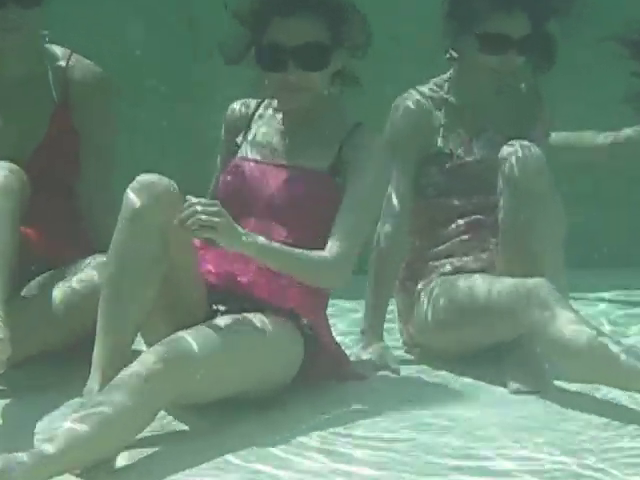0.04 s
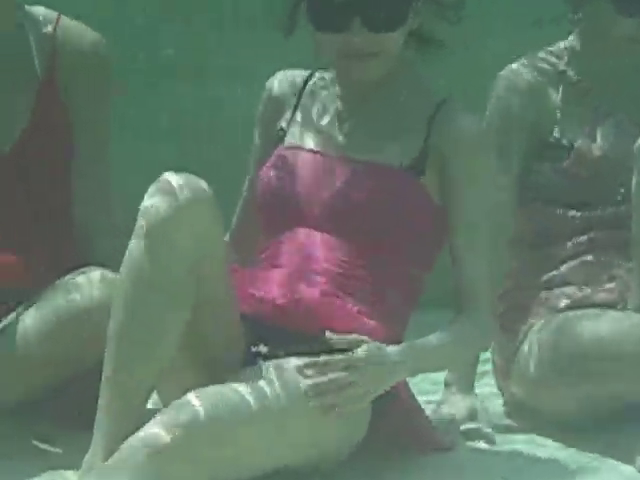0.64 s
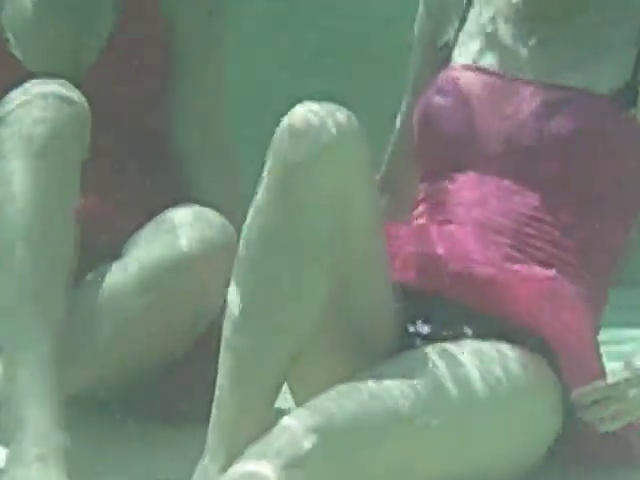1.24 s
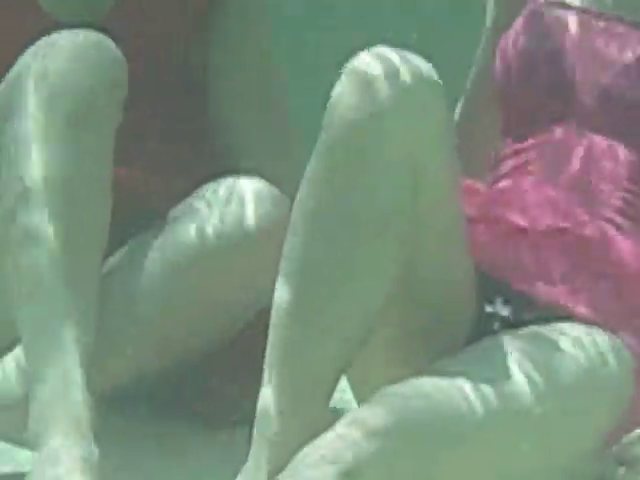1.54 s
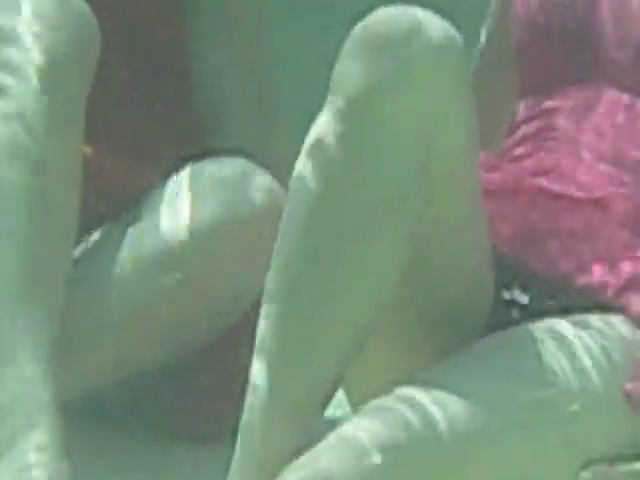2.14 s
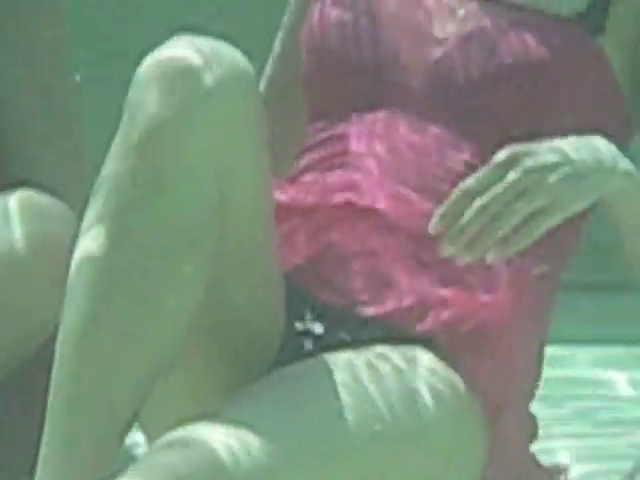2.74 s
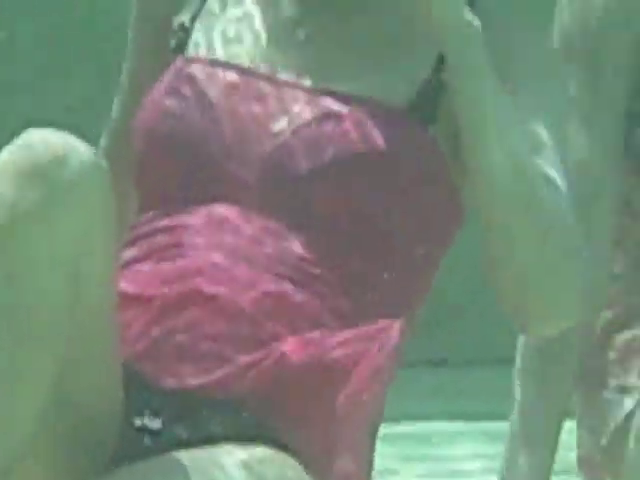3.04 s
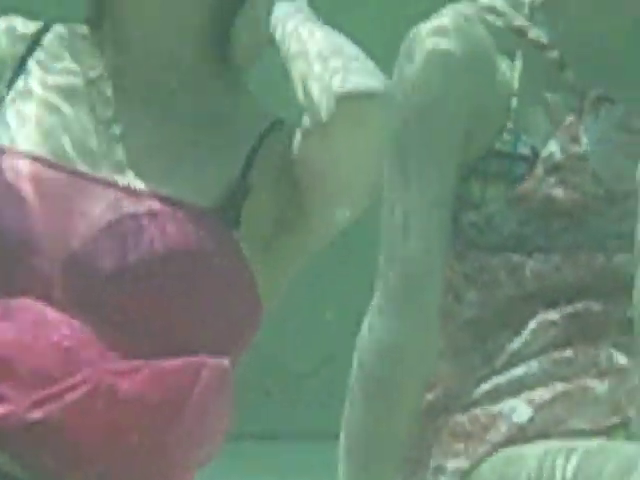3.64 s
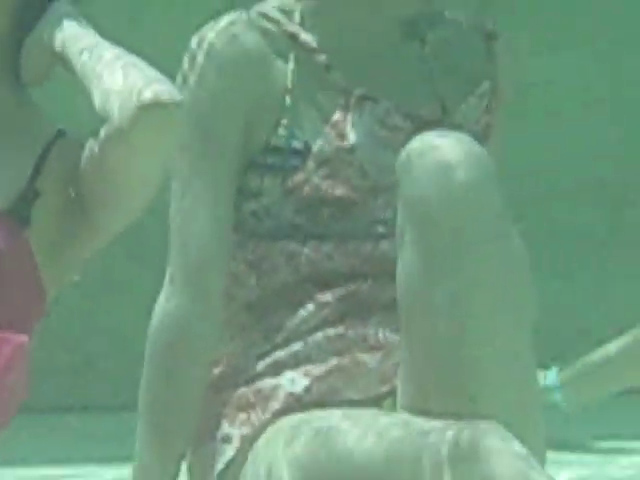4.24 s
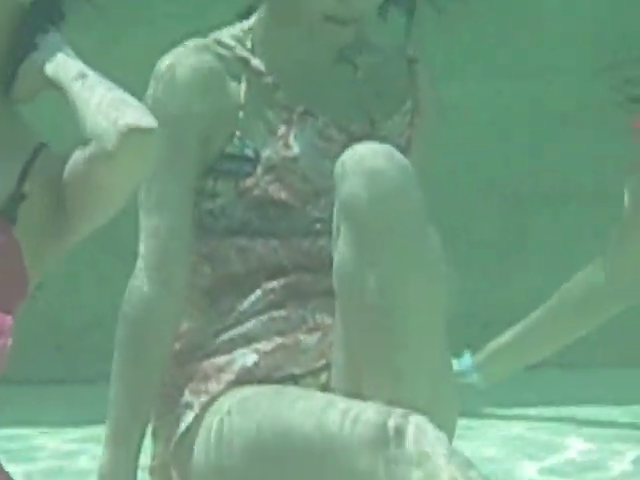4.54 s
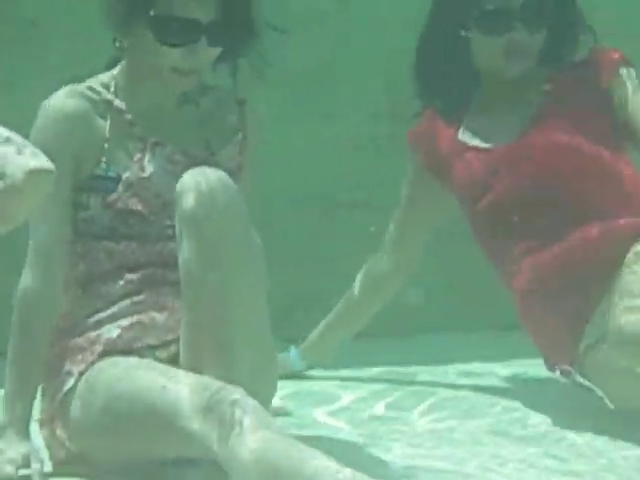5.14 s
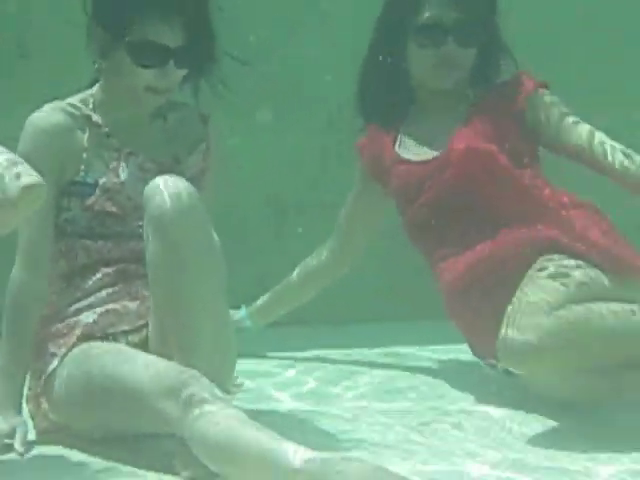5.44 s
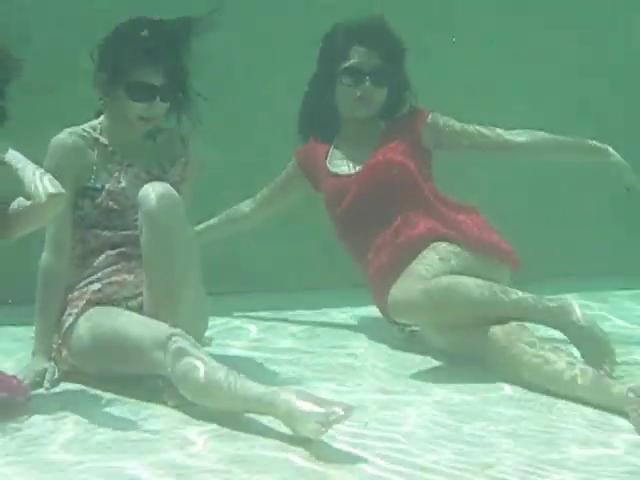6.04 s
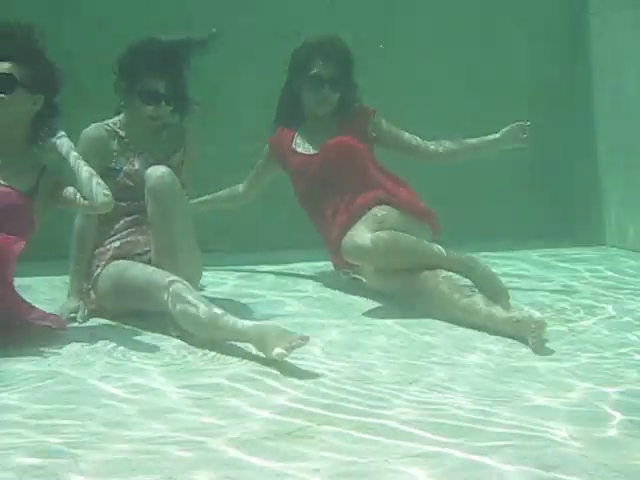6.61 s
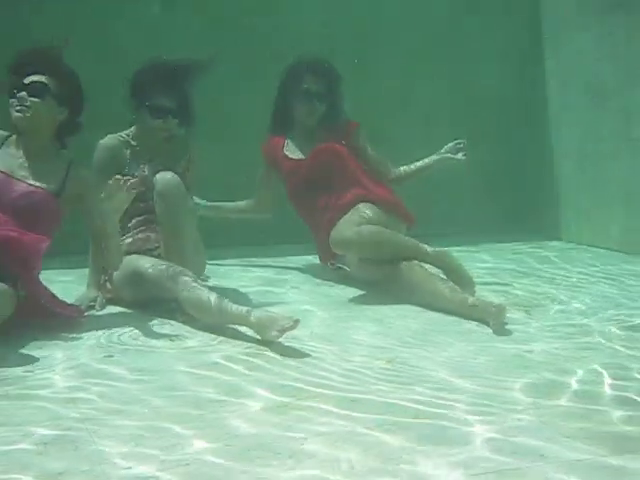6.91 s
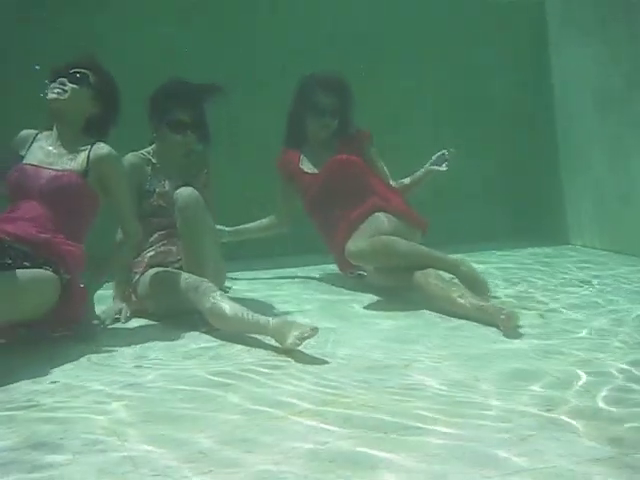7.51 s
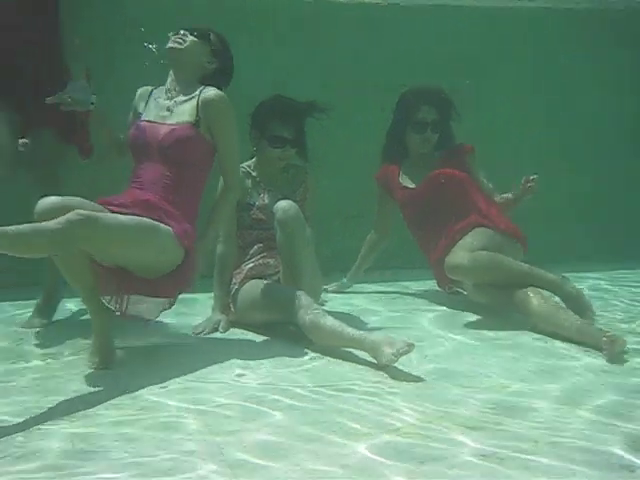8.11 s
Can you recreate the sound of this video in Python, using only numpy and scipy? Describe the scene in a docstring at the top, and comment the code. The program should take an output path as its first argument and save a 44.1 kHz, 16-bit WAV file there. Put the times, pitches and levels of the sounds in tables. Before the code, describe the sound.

Underwater in a swimming pool, churned water makes a steady muffled wash with small bubbles plinking near and far. The camera adds a faint hiss, thin whine and rapid ticking. A few seconds in, fingers knock and rub on its waterproof housing, followed by light rubs and soft, low bumps. Near the end comes the hardest knock, briefly overloading the microphone, then lighter clicks and rubs.

```python
"""Bottom of a swimming pool, heard through the microphone of a hand-held camera in a watertight housing.
From the start churned water makes a muffled wash with bubbles ringing near and far; right at the
microphone the camera hisses, whines and ticks once a frame, and the hand rumbles and bumps on the housing.
At 2.6 s fingers knock and rub on it, then rub again around 4 s. The grip shifts and bumps at 5.3 and 6.1 s.
At 7.1 s the hardest knock overloads the input and ducks the gain; lighter rubs and clicks follow."""
import sys
import numpy as np
from scipy import signal
from scipy.fft import rfft, irfft
from scipy.io import wavfile

SR = 44100
rng = np.random.default_rng(int(sys.argv[2]) if len(sys.argv) > 2 else 0)


def unload_audio(sound):
    """Save the sound as a 16-bit wav file, at the path given as the first command line argument."""
    columns = np.transpose(np.atleast_2d(sound))
    # keep every value between -1 and 1, then stretch to whole-number steps
    steps = np.round(np.clip(columns, -1, 1) * 32767)
    wavfile.write(sys.argv[1], SR, steps.astype(np.int16))


N = 369116
TIME = np.arange(N) / SR
HZ = np.fft.rfftfreq(N, 1 / SR)

# spectrum of the distant wash: f/Hz, relative level/dB
WASH_SPECTRUM = [(15, -2.5), (40, -4.5), (150, -4), (400, -1), (1000, 2), (1350, -5.5), (1750, -5),
                 (2300, -14.5), (2900, -13), (3500, -20.5), (5000, -24.5), (9000, -48)]
# resonances and nulls through which the water is heard: f/Hz, width/Hz, gain/dB
WATER_RESONANCES = [(344, 24, 2), (375, 67, -1.5), (455, 30, 4), (734, 92, -2.5), (842, 63, 3.5),
                    (954, 110, -2.5), (1016, 69, 6.5), (1235, 107, 5), (1430, 66, 2), (1521, 78, -9.5),
                    (1686, 86, 3), (1816, 200, -3), (2080, 150, 3.5), (2695, 160, 3.5), (3080, 140, -4)]
# spectrum of the camera's hiss: f/Hz, relative level/dB
HISS_SPECTRUM = [(500, -26), (3500, 4), (4400, -1), (5600, 4.5), (7000, 2), (8500, -3.5), (9700, -4.5),
                 (10700, -0.5), (12000, -6.5), (14500, -6.5), (15800, -11)]
# whines in that hiss: f/Hz, width/Hz, gain/dB
HISS_WHINES = [(5000, 260, 5.5), (5875, 220, 10.5), (6200, 200, 2.5), (7900, 110, 4), (11400, 56, 10.5)]
# shifts of the grip: middle t/s, length/s, rumble level/dB
GRIP_SHIFTS = [(3.598, 0.68, -55), (5.28, 0.23, -51), (6.112, 0.21, -52), (7.93, 0.69, -56.5)]
# bubbles close to the microphone: t/s, ring level/dB, f/Hz
NEAR_BUBBLES = [ (.069, -38, 2200), (.085, -39.5, 1760), (.130, -30.5, 1167), (.209, -37.5, 557),
                (.667, -34.5, 1620), (1.063, -40.5, 1710), (1.325, -43.5, 1610), (1.88, -39.5, 1810),
                (4.357, -39, 1790), (4.410, -34.5, 1210), (4.553, -39, 875), (5.201, -38, 1630),
                (5.384, -43, 1810), (6.65, -40, 1670), (6.788, -45, 2730), (6.858, -45, 2770),
                (7.957, -34, 884), (8.232, -33.5, 930)]
# modes of the housing: f/Hz, relative level/dB, t60/s
HOUSING_MODES = [(180, -9.5, 0.032), (305, -5, 0.026), (452.6, 3.5, 0.05), (638, 7.5, 0.017),
                 (862, 1.5, 0.039), (934, -14.5, 0.11), (1348, 6.5, 0.019), (1940, -39, 0.0027),
                 (2003, 6, 0.022), (2230, 4.5, 0.017), (2640, 3.5, 0.02), (3010, -6, 0.026),
                 (3600, 3, 0.014), (4920, 19.5, 0.0031), (5200, 9, 0.013), (6130, 14.5, 0.0067),
                 (7360, 4.5, 0.012), (10100, 4, 0.0056), (10460, -25, 0.0055), (13650, -4, 0.013),
                 (13500, -7, .005), (15400, -14, .007)]
# soft bumps of the hand: t/s, level/dB over 10 ms, centre f/Hz
SOFT_BUMPS = [ (1.421, -46.5, 170), (2.648, -39.5, 410), (3.5466, -39.5, 330), (4.725, -43.5, 330),
              (5.351, -36.5, 360), (5.67, -46, 270), (6.0096, -30, 362), (6.0527, -38.5, 265),
              (6.1223, -39.5, 400), (6.181, -42, 290), (6.227, -41.5, 220), (6.9615, -34, 550),
              (7.058, -28, 425), (7.0749, -36, 370), (7.0823, -34, 316), (7.1362, -29, 196),
              (7.436, -37, 386), (7.7452, -36, 300), (7.883, -39.5, 372), (8.0322, -38, 350),
              (8.3091, -35.5, 366)]
# hard knocks and clicks: t/s, level/dB over 10 ms before the bass cut, centre f/Hz, spread/octaves,
# share of bright edge, note of the struck spot f/Hz, share of that note
HARD_KNOCKS = [ (2.569, -38.5, 2750, 0.4, .02, 2720, 2), (2.6018, -28.5, 1300, 2.4, .15, 740, 1.4),
               (2.6075, -30, 1100, 1.6, .08, 2780, 1), (2.6123, -28.5, 800, 1.4, .03, 650, 1.9),
               (2.6389, -24, 1880, 0.93, .03, 800, 0.65), (2.6430, -26.5, 1390, 1.43, 0.23, 720, 0.41),
               (2.6469, -19.5, 1230, 1.43, .065, 2860, .42), (2.6808, -44, 2240, 1.4, .1, 2140, 0.58),
               (3.6573, -43.5, 2600, 1.2, 0.12, 1720, 1.1), (3.797, -39.5, 6000, 2.2, 0.41, 2080, 0.64),
               (4.016, -37, 1160, .45, .02, 1620, 0.94), (6.232, -34, 4830, .49, 0.24, 3760, 1.15),
               (6.9595, -36.5, 2200, 2.6, 0.39, 564, 0.24), (7.0556, -20.5, 2920, 1.1, 0.29, 5350, .38),
               (7.0610, -33.5, 3000, 1.3, .13, 2740, .5), (7.1357, -11.3, 1710, 2, 0.13, 5160, .33),
               (7.5780, -24.5, 4240, 1.15, 0.3, 5600, .85), (7.7480, -39, 5060, .78, 0.21, 5200, .28),
               (7.8323, -43, 5200, 1.5, .15, 5900, .4), (8.3019, -28.5, 2600, 1.6, .02, 6050, 3.7)]
# finger rubs: start t/s, release t/s, level/dB at release, swell/(dB/s), time to fade by 20 dB/s
FINGER_RUBS = [(2.587, 2.633, -38.5, 50, 0.02), (3.725, 3.812, -42, 150, 0.11),
               (3.946, 4.103, -49, 57, 0.05), (6.929, 7.033, -38, 61, 0.1),
               (7.677, 7.739, -38.5, 170, 0.23)]
# spectrum of skin rasping on the housing: f/Hz, relative level/dB
RASP_SPECTRUM = [(200, -8.5), (500, 13), (1200, -6.5), (2400, 0), (4000, 2), (6000, 2.5), (7600, -5.5),
                 (8500, -7.5), (12500, -11), (15800, -16)]
# resonances that the rasp brings out: f/Hz, width/Hz, gain/dB
RASP_RESONANCES = [(1970, 400, 11.5), (2760, 150, 11), (3430, 230, 9.5), (5140, 610, 6.5), (7300, 480, 9.5),
                   (11200, 300, 9), (12500, 450, 2)]

RESTING_DB = -68.5  # rumble of the hand held still


def gain_of(db):
    """Decibels to amplitude."""
    return 10 ** (np.asarray(db) / 20)


def unit_rms(x):
    """The same sound at rms 1."""
    return x / np.sqrt(np.mean(x ** 2) + 1e-20)


def at_level(x, db):
    """Scales a short sound so that its energy equals 10 ms at db."""
    return gain_of(db) * x * np.sqrt(SR / 100 / np.sum(x ** 2))


def add(mix, s, sound):
    """Mixes a sound in at s seconds."""
    part = mix[max(round(s * SR), 0):][:len(sound)]
    part += sound[:len(part)]


def curve_db(points):
    """Spectrum points joined on a log-frequency axis."""
    hz, db = np.transpose(points)
    return np.interp(np.log(HZ + 1), np.log(hz), db)


def humps_db(rows):
    """Bell-shaped resonances and nulls."""
    return sum(db * .5 ** ((2 * (HZ - hz) / width) ** 2) for hz, width, db in rows)


def coloured(x, db):
    """Filters a whole track by a gain in dB at each frequency."""
    return irfft(rfft(x) * gain_of(db), N)


def drift(top_hz):
    """Random wander of rms 1, slower than top_hz."""
    return unit_rms(irfft(rfft(rng.standard_normal(N)) * (HZ < top_hz), N))


def bell(hz, centre_hz, octaves):
    """A bell-shaped weight on a log-frequency axis."""
    return np.exp(-.5 * (np.log2((hz + 1) / centre_hz) / octaves) ** 2)


def band_noise(size, centre_hz, octaves, top_hz=SR):
    """Noise of rms 1 around a centre, dulled above top_hz."""
    hz = np.fft.rfftfreq(size, 1 / SR)
    shape = bell(hz, centre_hz, octaves) / np.hypot(1, hz / top_hz)
    return unit_rms(irfft(rfft(rng.standard_normal(size)) * shape, size))


def wash(level_db=-47.5, swell_db=.3, churn_db=.8):
    """Countless distant bubbles merge into a dull, nearly steady wash; each octave churns by itself."""
    colour_db = curve_db(WASH_SPECTRUM) + humps_db(WATER_RESONANCES)
    spectrum = rfft(unit_rms(coloured(rng.standard_normal(N), colour_db)))
    centres = np.log2(np.geomspace(80, 5000, 7))
    out = np.zeros(N)
    for pick in np.eye(len(centres)):
        band = irfft(spectrum * np.interp(np.log2(HZ + 1), centres, pick), N)
        out += band * gain_of(churn_db * drift(30))
    return gain_of(level_db) * unit_rms(out * gain_of(swell_db * drift(11)))


def camera_hiss(level_db=-60.5):
    """The camera's own steady noise, with thin whines in it."""
    colour_db = curve_db(HISS_SPECTRUM) + humps_db(HISS_WHINES)
    return gain_of(level_db) * unit_rms(coloured(rng.standard_normal(N), colour_db))


def camera_whine(hz=7865, level_db=-73.5, waver_hz=16):
    """The thin, wavering tone of the camera."""
    turns = np.cumsum(hz + waver_hz * drift(71)) / SR
    return gain_of(level_db) * unit_rms(np.sin(2 * np.pi * turns))


def grip_db(s):
    """Level of the hand's rumble at time s: each shift of the grip swells and dies away."""
    shifts = sum(gain_of(db) * .5 ** ((2 * (s - middle) / length) ** 2)
                 for middle, length, db in GRIP_SHIFTS)
    return 20 * np.log10(gain_of(RESTING_DB) + shifts)


def grip_rumble(centre_hz=140, octaves=1.5, lumpy_db=11.5):
    """Handling noise: the hand kneads the housing in low, soft lumps."""
    lumps = band_noise(N, centre_hz, octaves) * gain_of(lumpy_db * np.tanh(drift(36)))
    return gain_of(grip_db(TIME)) * unit_rms(lumps)


def frame_ticks(frame_hz=30, first_s=.0088, tick_s=.0021, tick_hz=5100, tick_db=-70, spark_db=-79):
    """Right at the microphone the camera ticks once a frame: an uneven pip with a spark of high noise."""
    since = (TIME - first_s) % (1 / frame_hz)
    gate = np.sin(np.pi * np.minimum(since / tick_s, 1)) ** 2 * gain_of(2 * drift(34))
    pip = unit_rms(gate * np.sin(2 * np.pi * tick_hz * since))
    spark = unit_rms(gate * band_noise(N, 9900, octaves=.17))
    return gain_of(tick_db) * pip + gain_of(spark_db) * spark


def ring_time(hz):
    """A nearby bubble's t60 in seconds: big, low bubbles ring longest."""
    return .05 * (1500 / hz) ** .64


def bubble(hz, t60, snap=.36, rise=.069, attack_s=.00038, snap_s=.007):
    """A bubble pinches off with a snap, smeared by the pool walls, then rings and rises a little."""
    t = TIME[:SR // 10]
    turns = hz * np.cumsum(1 + rise * (t / t60 - .2)) / SR
    ring = np.sin(2 * np.pi * turns) * gain_of(-60 * t / t60)
    smear = band_noise(len(t), hz, octaves=.3) * np.exp(-t / snap_s)
    return (ring + snap * smear) * (1 - np.exp(-t / attack_s))


def near_bubbles(stray_hz=1800, stray_octaves=.175, stray_db=-51.5, stray_range_db=8):
    """Single bubbles close to the microphone, and strays of like size a little further off."""
    out = np.zeros(N)
    for s, db, hz in NEAR_BUBBLES:
        add(out, s, gain_of(db) * bubble(hz, ring_time(hz), snap=.58))
    for when, pitch, loud in rng.random(size=(30, 3)):
        hz = stray_hz * 2 ** (stray_octaves * (2 * pitch - 1))
        add(out, when * N / SR, gain_of(stray_db + stray_range_db * loud) * bubble(hz, ring_time(hz)))
    return out


def far_bubbles(base_db=-50.5, spread_db=2.5, low_hz=800, high_hz=3000, mean_t60=.053):
    """Many faint bubbles out in the pool, coloured by the water; the small, high ones are weaker."""
    out = np.zeros(N)
    for when, pitch, loud, life in rng.random(size=(480, 4)):
        hz = low_hz * (high_hz / low_hz) ** pitch
        db = base_db + spread_db * min(-np.log(loud), 3)
        strength = gain_of(db) * (low_hz / hz) ** .54
        add(out, when * N / SR, strength * bubble(hz, mean_t60 * (.5 + life)))
    return coloured(out, humps_db(WATER_RESONANCES))


def fizz(base_db=-52, spread_db=3, low_hz=4700, high_hz=6500):
    """Pinhead bubbles prickle now and then."""
    out = np.zeros(N)
    for when, pitch, loud in rng.random(size=(45, 3)):
        hz = low_hz + pitch * (high_hz - low_hz)
        db = base_db + spread_db * min(-np.log(loud), 3)
        add(out, when * N / SR, gain_of(db) * bubble(hz, t60=.019, snap=.25))
    return out


def housing_ring(t, centre_hz, octaves, attack_s=.00045):
    """The water-damped housing rings around the microphone; a touch excites the modes near centre_hz."""
    ring = np.zeros(len(t))
    for k, (hz, db, t60) in enumerate(HOUSING_MODES):
        excitation = (-1) ** k * bell(hz, centre_hz, octaves)
        ring += excitation * gain_of(db - 60 * t / t60) * np.sin(2 * np.pi * hz * t)
    return unit_rms(ring * (1 - np.exp(-t / attack_s)))


def nudges(count=45, base_db=-54, spread_db=5.5, centre_hz=326, follow=.3):
    """Small random bumps, stronger while the grip shifts: rows of t/s, level/dB, f/Hz."""
    when, loud, pitch = rng.random(size=(count, 3)).T
    s = (np.arange(count) + when) / count * N / SR
    db = base_db + follow * (grip_db(s) - RESTING_DB) + spread_db * (2 * loud - 1)
    return list(zip(s, db, centre_hz * 2 ** (pitch - .5)))


def bumps(push_share=.48, push_s=.00043, scuff_share=.12, scuff_hz=1000, scuff_s=.0017):
    """Soft flesh gives the housing a short push and a faint scuff, and rings only its lowest modes."""
    out, t = np.zeros(N), TIME[:SR // 16]
    push = unit_rms(t ** 2 * np.exp(-2 * t / push_s))
    for s, db, centre_hz in SOFT_BUMPS + nudges():
        scuff = unit_rms(band_noise(len(t), scuff_hz, octaves=.85) * np.sqrt(t) * np.exp(-2 * t / scuff_s))
        ring = housing_ring(t, centre_hz, octaves=.34)
        add(out, s, at_level(ring - push_share * push + scuff_share * scuff, db))
    return out


def knocks(contact_s=.0021, crunch_share=.83, edge_hz=11500, bass_cut_hz=240):
    """Fingers strike the housing: a crunch with a bright edge, then the shell and the struck spot ring."""
    out, t = np.zeros(N), TIME[:SR // 16]
    contact = t * np.exp(-2.4 * t / contact_s)
    for s, db, centre_hz, octaves, edge_share, note_hz, note_share in HARD_KNOCKS:
        crunch = unit_rms(contact * band_noise(len(t), centre_hz, octaves, top_hz=3500))
        edge = unit_rms(contact * band_noise(len(t), edge_hz, octaves=.4))
        t60 = .012 * np.sqrt(1500 / note_hz)  # water damps high notes sooner
        note = unit_rms(np.sqrt(t) * gain_of(-60 * t / t60) * np.sin(2 * np.pi * note_hz * t))
        ring = housing_ring(t, centre_hz, octaves)
        add(out, s, at_level(ring + crunch_share * crunch + edge_share * edge + note_share * note, db))
    # such brief contacts carry little bass
    return signal.lfilter(*signal.butter(2, bass_cut_hz, "highpass", fs=SR), out)


def rub_pressure(start, release, db, swell_db_per_s, fade_s, bite_s=.021):
    """The skin takes hold, presses harder until the finger lets go, and the pressure fades."""
    before_db = swell_db_per_s * np.maximum(release - TIME, 0)
    after_db = 20 * np.maximum(TIME - release, 0) / fade_s
    return np.clip((TIME - start) / bite_s, 0, 1) * gain_of(db - before_db - after_db)


def rubbing(slips_per_s=2200, snags_per_s=60, snag_share=.35, smooth_share=.74, flutter_db=1.4):
    """Tiny slips of skin, and now and then a larger snag, rasp on the housing and ring it."""
    slips = rng.standard_normal(N) * (rng.random(N) < slips_per_s / SR)
    snags = (rng.random(N) - .5) * (rng.random(N) < snags_per_s / SR)
    friction = unit_rms(slips) + snag_share * unit_rms(snags) + smooth_share * rng.standard_normal(N)
    friction *= gain_of(flutter_db * drift(110))
    rasp = unit_rms(coloured(friction, curve_db(RASP_SPECTRUM) + humps_db(RASP_RESONANCES)))
    return rasp * sum(rub_pressure(*row) for row in FINGER_RUBS)


def scene():
    """One microphone on the pool floor: water all around, hands on the housing, the camera inside it."""
    water = wash() + near_bubbles() + far_bubbles() + fizz()
    hands = knocks() + bumps() + grip_rumble() + rubbing()
    camera = camera_hiss() + frame_ticks() + camera_whine()
    return (water + hands + camera)[None]


def record(dry, ceiling=.74, threshold_db=-17, duck_share=.55, recover_db_per_s=200, top_hz=15900):
    """The hardest knock overloads the microphone input and ducks the gain; a low-pass ends the chain."""
    clipped = dry / (1 + (dry / ceiling) ** 4) ** (1 / 4)
    power_db = 10 * np.log10(signal.lfilter([.01], [1, -.99], clipped[0] ** 2) + 1e-12)
    recovery_db = recover_db_per_s * TIME
    held_db = np.maximum.accumulate(power_db + recovery_db) - recovery_db  # each peak falls away steadily
    excess_db = np.maximum(held_db - threshold_db, 0)
    lag = np.exp(-1 / (.005 * SR))  # the gain follows with a 5 ms lag
    ducked = clipped / gain_of(duck_share * signal.lfilter([1 - lag], [1, -lag], excess_db))
    lowpass = signal.firwin(511, top_hz, window=("kaiser", 9), fs=SR)
    return signal.oaconvolve(ducked, lowpass[None], "same")


dry = scene()
out = record(dry)
unload_audio(out)
```